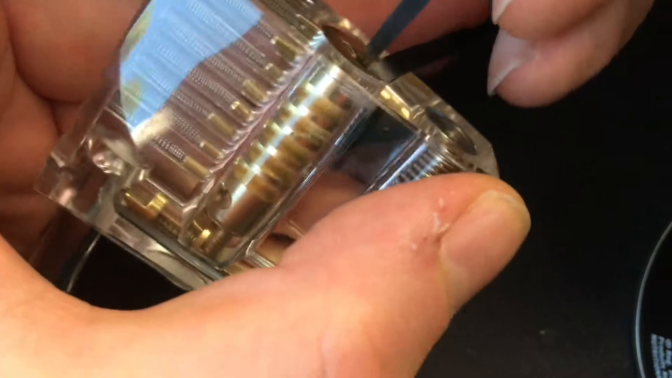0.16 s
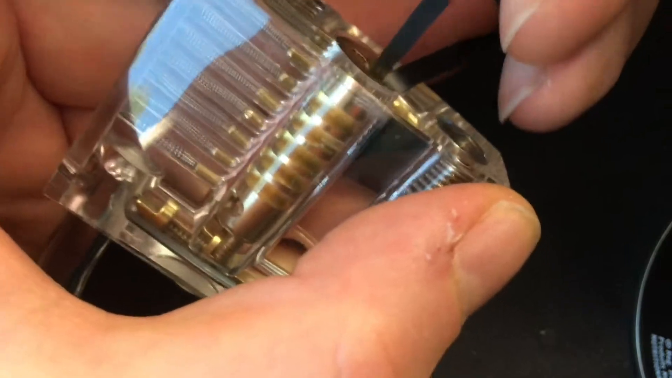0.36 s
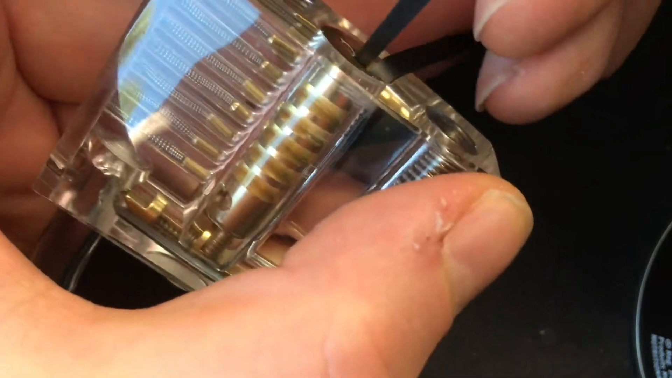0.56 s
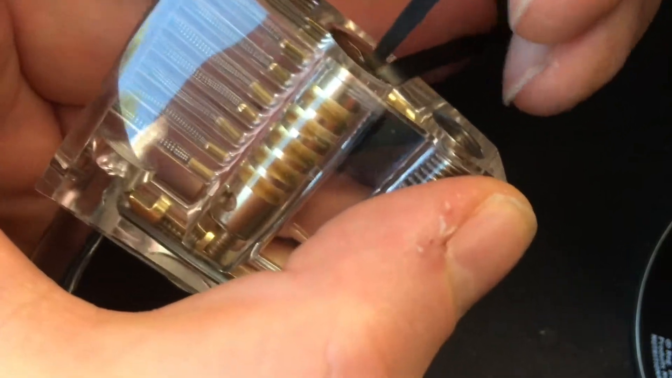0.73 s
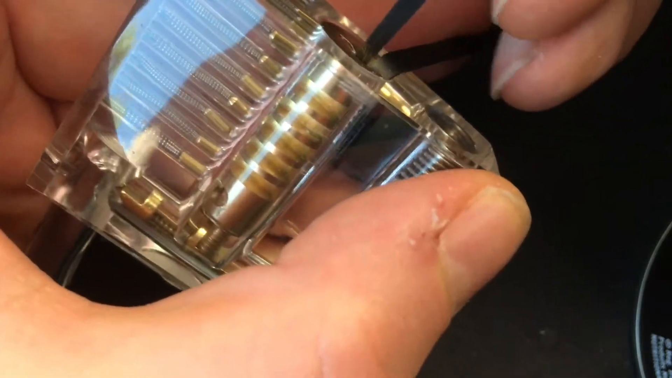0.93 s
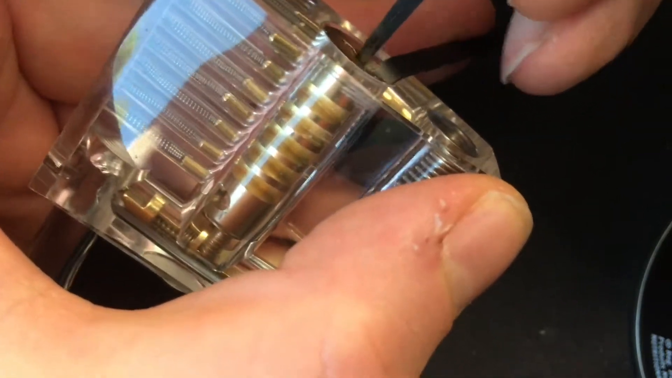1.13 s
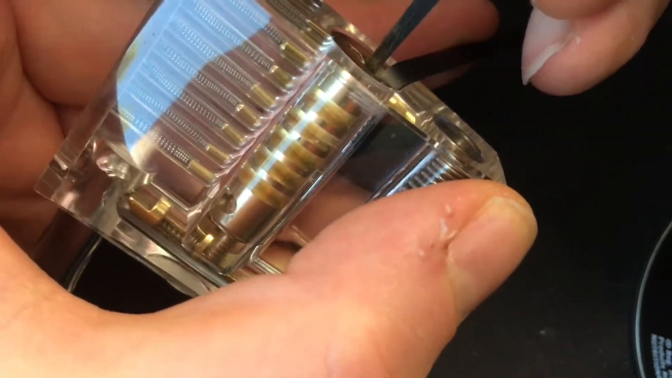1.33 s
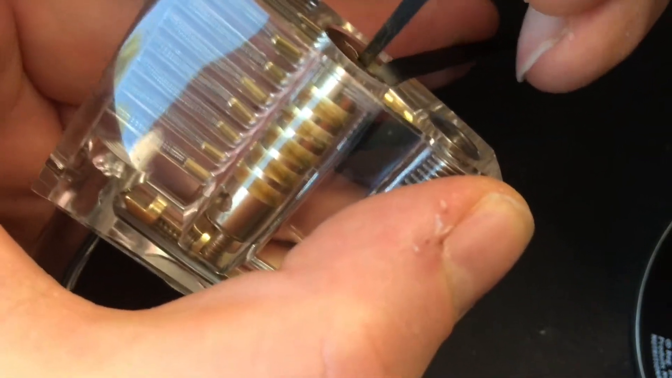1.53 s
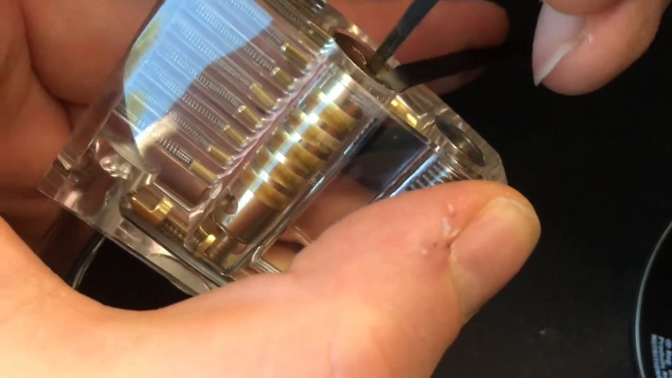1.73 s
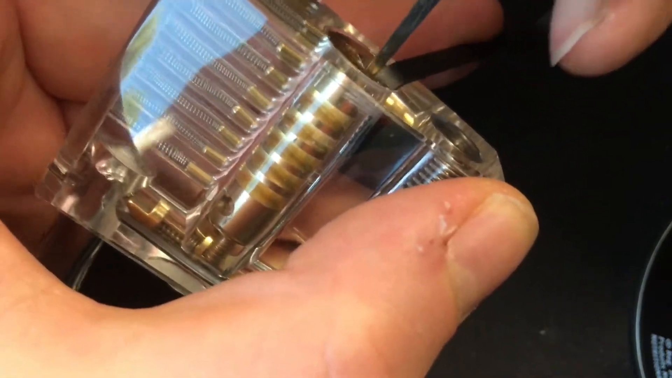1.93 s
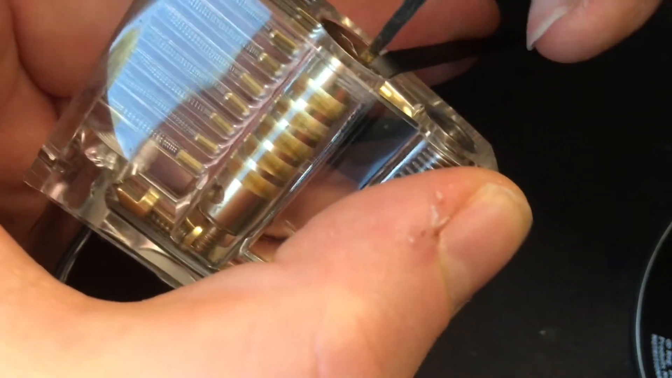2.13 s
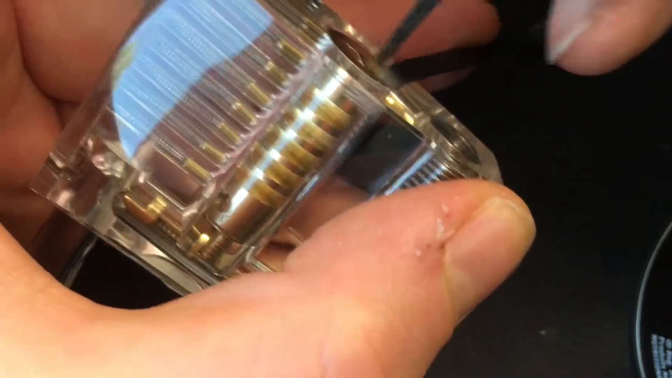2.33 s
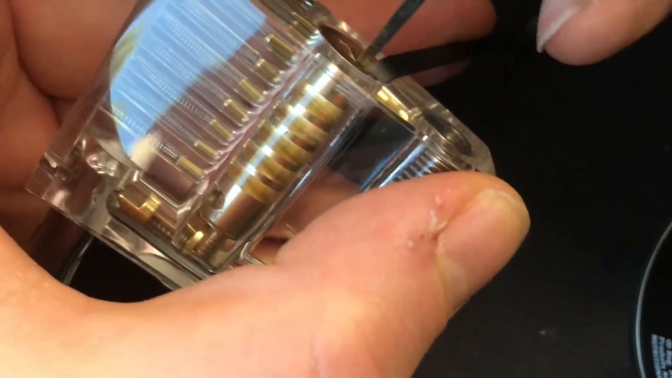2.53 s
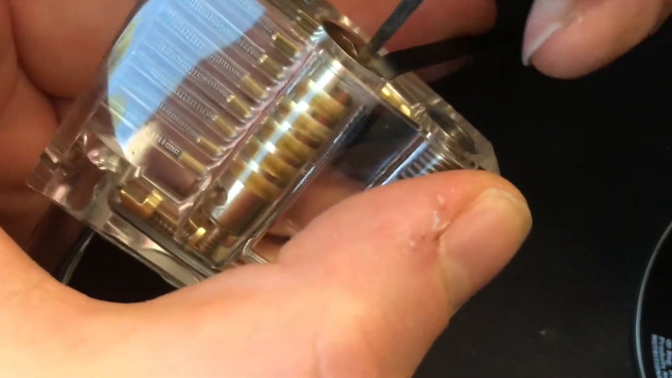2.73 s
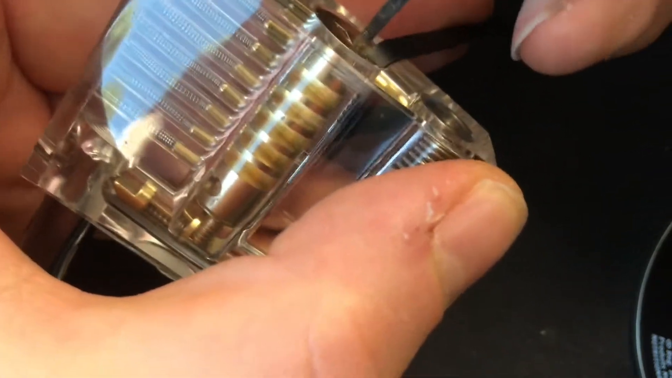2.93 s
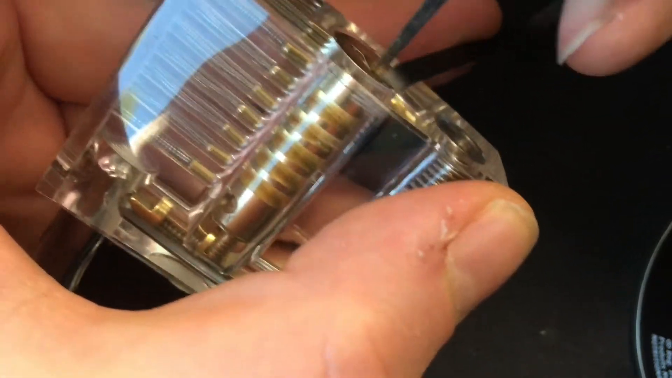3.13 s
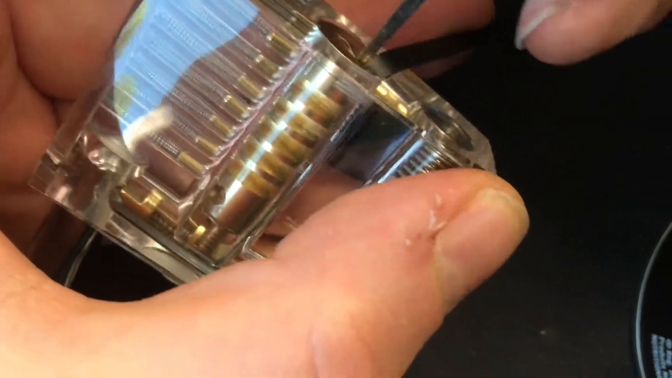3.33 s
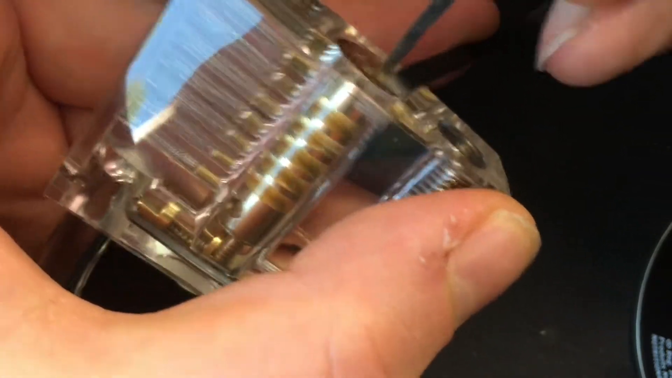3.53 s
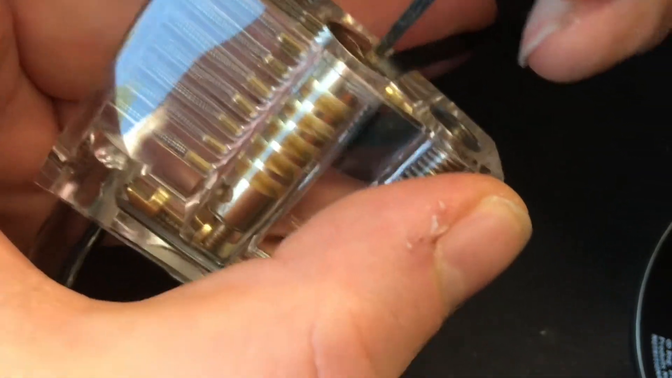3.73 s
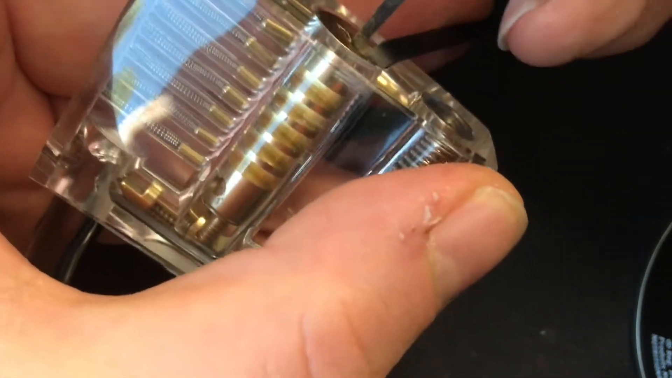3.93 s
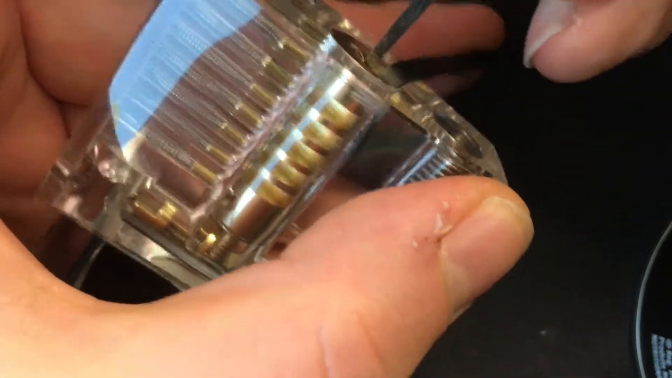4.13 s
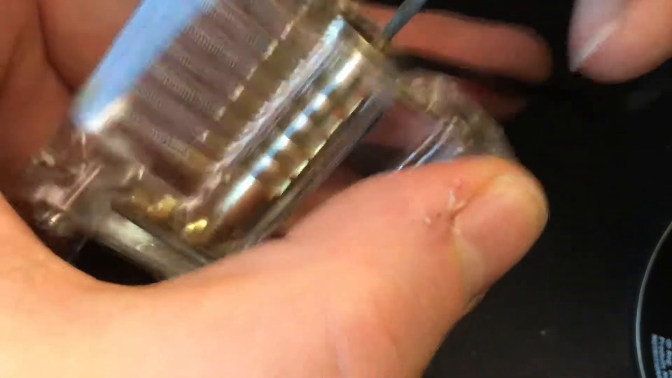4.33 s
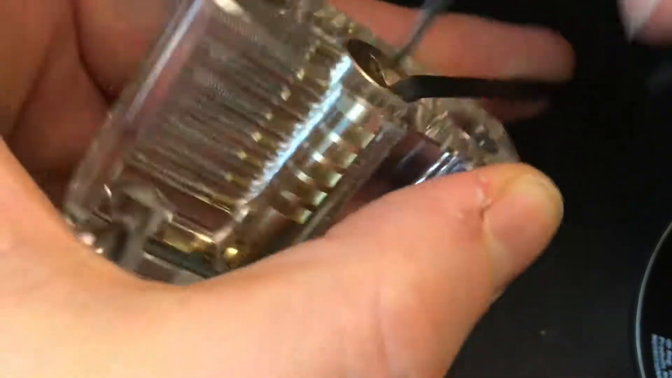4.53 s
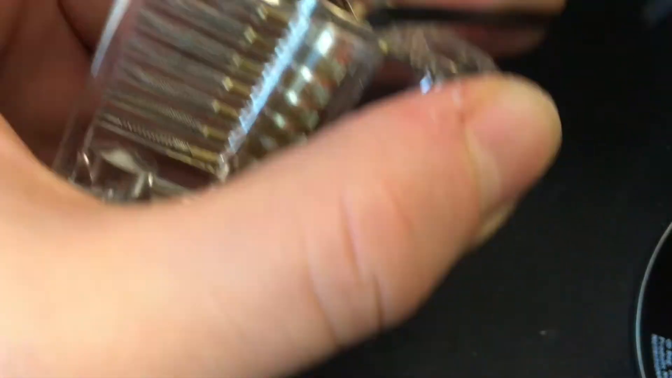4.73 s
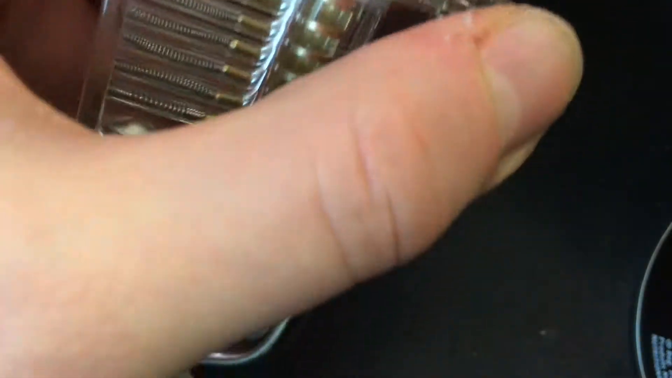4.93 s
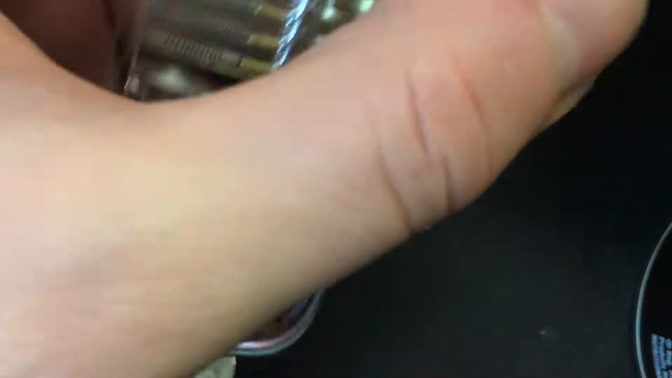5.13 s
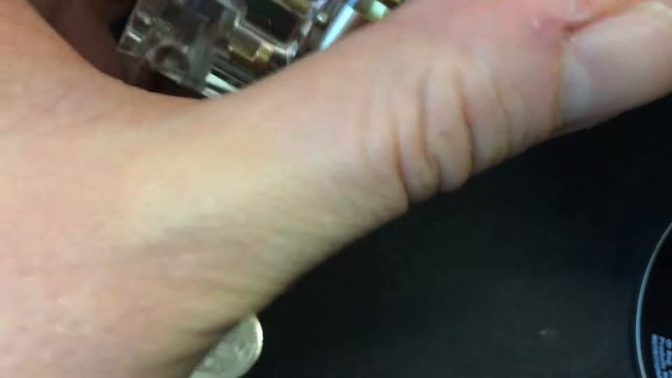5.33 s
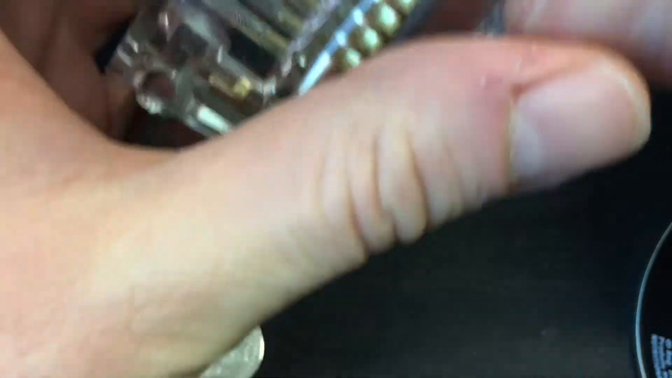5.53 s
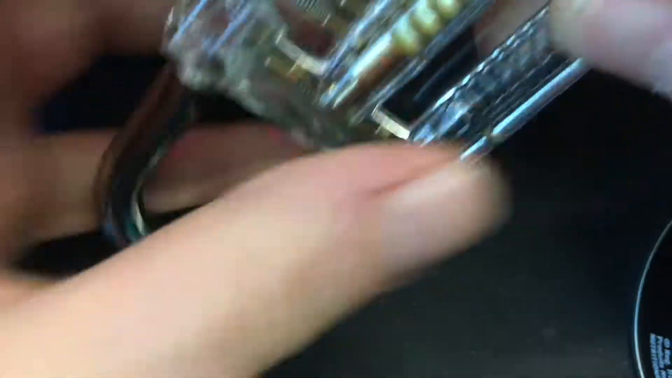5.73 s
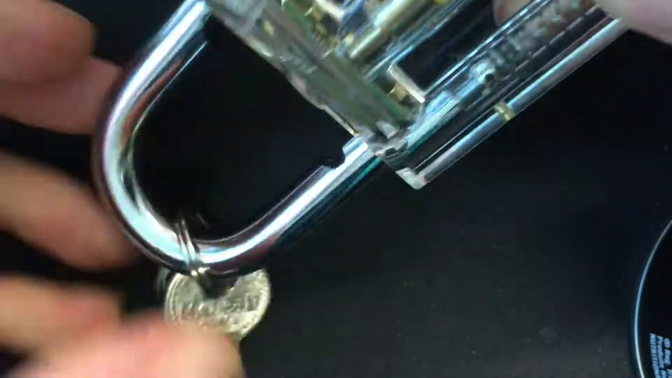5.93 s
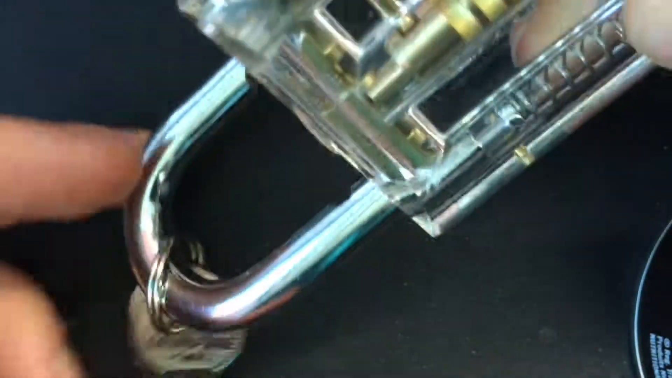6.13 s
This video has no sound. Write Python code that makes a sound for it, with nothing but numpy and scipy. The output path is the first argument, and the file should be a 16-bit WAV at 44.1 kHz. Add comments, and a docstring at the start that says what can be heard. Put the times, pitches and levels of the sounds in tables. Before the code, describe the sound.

Sparse, dry metallic ticks of lock picking, a sudden sharp clack as the shackle springs open, then bright keys jingling, half muffled by the hand.

```python
"""A low room hum and rumble (shaped noise), with a faint grainy hiss that swells and sinks, lie under a
padlock being picked. The pick clicks brass pins (short noisy contacts that ring the plug) and scrapes them
(clumps of tiny grains). Then the shackle of the clear plastic padlock springs open, knocking its case and
jolting the hand (thuds). Keys on the shackle jingle (bright clashes and dying tones), slide and jostle,
muffled now more, now less, as the hand turns the lock. A small room adds a faint echo to lock and keys."""
import sys
import numpy as np
from scipy import signal
from scipy.io import wavfile

SR = 44100
rng = np.random.default_rng(int(sys.argv[2]) if len(sys.argv) > 2 else 0)


def store_pcm(level_fs):
    """Save levels as 16-bit WAV."""
    pcm = np.round(np.clip(level_fs, -1, 1) * 32767).astype(np.int16)
    wavfile.write(sys.argv[1], SR, np.atleast_2d(pcm).T)


N = 272097  # length of the scene in samples
T = np.arange(SR // 2) / SR  # the half second of time that each short sound may fill


def gain_of(db):
    """Turns decibels into an amplitude factor."""
    return 10 ** (np.asarray(db) / 20)


def evened(x):
    """Scales a sound so that its average strength (rms) is 1."""
    return x / np.sqrt(np.mean(x ** 2) + 1e-20)


def unit(x):
    """Scales a sound so that its total energy is 1."""
    return x / np.linalg.norm(x)


def read(points, hz):
    """Reads a curve over frequency, spacing pitches evenly as the ear does."""
    f, value = np.transpose(points)
    return np.interp(np.log(hz + 1), np.log(f + 1), value)


def follow(points, s):
    """Reads a curve over time at the times s."""
    return np.interp(s, *np.transpose(points))


def add(mix, s, sound):
    """Mixes a sound in, starting at time s."""
    part = mix[max(round(s * SR), 0):][:len(sound)]
    part += sound[:len(part)]


def colour(x, points, size=8192):
    """Filters a sound to the given (Hz, dB) shape, with no response ahead of the sound."""
    hz = abs(np.fft.fftfreq(size, 1 / SR))
    log_gain = np.log(gain_of(read(points, hz)))
    # the phase that goes with this shape when the energy comes as early as possible
    spectrum = np.exp(np.conj(signal.hilbert(log_gain)))
    taps = np.fft.ifft(spectrum).real[:size // 2]
    return signal.fftconvolve(x, taps)[:len(x)]


def flutter(n, per_s):
    """A random wobble of rms 1 that changes about per_s times a second."""
    steps = np.arange(n) * per_s / SR
    return np.interp(steps, np.arange(n), rng.standard_normal(n)) * np.sqrt(3 / 2)


def ring(modes, vary_db, stretch=1, detune=0):
    """Adds up dying tones; each blow lands elsewhere and weights them anew."""
    out = np.zeros(len(T))
    for hz, db, t60 in modes:
        mode = np.cos(2 * np.pi * hz * (1 + detune * rng.standard_normal()) * T)
        mode *= gain_of(-60 * T / (t60 * stretch))
        out += gain_of(db + vary_db * rng.standard_normal()) * unit(mode)
    return out


def chatter(decay, snap):
    """One sharp contact within a dying spray of tiny ones."""
    fade = np.exp(-T / max(decay, 1e-4)) * np.minimum(T / 0.00036, 1)
    spray = unit(rng.standard_normal(len(T)) * fade)
    spray[round(.0002 * SR)] += snap
    return unit(spray)


def settling(at_0_db, db):
    """Chatter time of a contact: firmer ones settle sooner, halving with every 27 dB."""
    return at_0_db * 2 ** (-db / 27)


def strike(modes, decay, snap, ring_db):
    """A contact heard directly and through the tones that it sets ringing."""
    contact = chatter(decay, snap)
    body = signal.fftconvolve(contact, unit(ring(modes, vary_db=0.5, detune=0.008)))[:len(T)]
    return unit(contact + gain_of(ring_db) * body)


def slips(length, per_s, clump_db):
    """Stick and slip: a swell of tiny grains that come in clumps."""
    n = int(length * SR)
    size = rng.standard_normal(n) * gain_of(clump_db * np.minimum(flutter(n, per_s=274.5), 2))
    grains = (rng.random(n) < per_s / SR) * size
    return evened(grains) * signal.windows.tukey(n, .6)


# Tone of the room hum. Each row: frequency in Hz, relative strength in dB.
HUM_COLOUR = [(20, -22.5), (48, -16.5), (110, -10), (160, -6.5), (205, -6), (245, -11.5), (290, -10.5),
              (500, -24), (740, -25.5), (1030, -34), (1550, -30.5), (3400, -41), (5200, -52.5),
              (16000, -68)]


def hum():
    """Steady, broad low hum of the room, made of shaped noise."""
    return gain_of(-45.5) * evened(colour(rng.standard_normal(N), HUM_COLOUR))


# Slow rise and fall of the rumble. Each row: time in seconds, level in dB.
RUMBLE_LEVEL = [(0.0, -47.5), (0.27, -49), (0.31, -40), (0.43, -54), (1.17, -42.5), (2.22, -50.5),
                (2.37, -38), (2.8, -47.5), (3.13, -41), (3.2, -54), (3.38, -40.5), (4.19, -51.5),
                (4.45, -44), (4.48, -58.5), (4.55, -44), (4.66, -60), (4.83, -44.5), (5.65, -49),
                (5.84, -41.5), (6.12, -55), (6.17, -35)]
# Tone of the rumble. Each row: frequency in Hz, relative strength in dB.
RUMBLE_TONE = [(20, -30), (40, -7), (60, -1), (110, -4), (170, -9), (400, -40), (1000, -75)]


def rumble():
    """Unsteady low noise that swells and sinks beneath the hum."""
    swells = gain_of(1.84 * flutter(N, per_s=14))
    noise = evened(colour(rng.standard_normal(N), RUMBLE_TONE) * swells)
    return noise * gain_of(follow(RUMBLE_LEVEL, np.arange(N) / SR))


# Swells of the hiss. Each row: start in seconds, length in seconds, level in dB before the fades.
HISS_SWELLS = [(-.1, 0.89, -63), (2.43, 0.47, -67), (4.024, 0.77, -62), (4.814, 0.6, -58.5),
               (5.78, 0.12, -53), (5.96, .3, -60)]
# Tone of the hiss. Each row: frequency in Hz, relative strength in dB.
HISS_COLOUR = [(300, -16), (1000, 8), (3500, 1), (6500, 0), (10000, -2), (16000, -7)]
SWELL_FADE_S, RESTING_DB = 0.19, -75.5  # how gently a swell starts and stops; the hiss between swells


def hiss():
    """Faint grainy hiss that swells and sinks: noise of uneven grain size."""
    t = np.arange(N) / SR
    level = gain_of(RESTING_DB) * np.ones(N)
    for s, length, db in HISS_SWELLS:
        inside = np.minimum(t - s, s + length - t)  # seconds to the nearer end of the swell
        level = np.hypot(level, gain_of(db) * np.clip(.5 + inside / SWELL_FADE_S, 0, 1))
    grains = rng.standard_normal(N) * gain_of(2 * np.minimum(rng.exponential(1, N), 5))
    wobble = gain_of(1.84 * flutter(N, per_s=57))
    return evened(colour(grains * wobble, HISS_COLOUR)) * level


# Pins snapping under the pick. Each row: start in seconds, level in dB before colouring,
# body (lower tone) setting in dB, edge (treble) setting in dB, both relative to the level.
PIN_CLICKS = [(0.0477, -3.5, 4, -8.5), (0.3283, 0.5, -7.5, -10), (0.36, -3, -1.5, -12),
              (0.4934, -10.5, -5, -14.5), (0.51, -14.5, 8.5, -11), (0.675, -4.5, -5, -8.5),
              (0.755, -17, 1, -2.5), (1.0502, -12, -9, -11), (1.0564, -9, -9, -3.5),
              (1.092, -15.5, -5, -3.5), (1.1726, -13, -2, -14), (1.178, -2.5, -6.5, -2),
              (1.392, 2.5, -15.5, -17.5), (1.488, -16, -11, -17.5), (1.506, -17.5, -7, -18),
              (1.663, -20, -19, -13), (1.8662, -19.5, -22, -10), (1.8892, -17.5, -18, -6),
              (1.985, -20, 6.5, -23), (2.322, -30, 2, -12), (2.4085, -22, -9, -8),
              (2.653, -13.5, -3.5, -15), (2.7098, -15, 2, -21), (3.1153, -15, -18, -9.5),
              (3.1576, -8, -21, -9.5), (3.2078, -21.5, -18, -9), (3.7155, -13.5, -6, -5.5),
              (3.9287, 8, -2.5, -14), (3.9307, 4, -10, 2), (4.1732, -11.5, 1, -18), (4.2656, -16, -9, -3),
              (4.322, -17.5, -15, -19)]
# What the pins and plug ring with.
# Each row: frequency in Hz, relative strength in dB, time in seconds to die by 60 dB.
PLUG_MODES = [(1600, -9, .008), (3700, -7, .012), (4100, -5, .025), (4400, -2, .025), (5800, -8, .01),
              (6350, -8, .01), (8600, -9, .006), (12350, -4, .008), (13600, -10, .006), (15500, -7, .005)]
PIN_CHATTER_S = 0.0023  # fading time of the chatter after a click of 0 dB


def pins():
    """Small brass pins click into place, chattering briefly and ringing the plug."""
    out = np.zeros(N)
    for s, db, body_db, edge_db in PIN_CLICKS:
        shape = [(300, -28.5), (750, body_db - 11.0), (1200, body_db), (1900, body_db - 1),
                 (2900, -6.5), (4200, -1), (6200, edge_db / 2 - .5), (7600, edge_db / 2 - 2),
                 (10300, edge_db + 0.5), (12300, edge_db + 1.5), (16000, edge_db + 0.5)]
        # dull, heavy contacts ring the plug; bright snaps stay dry
        ring_db = -12 - .5 * edge_db
        click = strike(PLUG_MODES, settling(PIN_CHATTER_S, db), snap=0.26, ring_db=ring_db)
        add(out, s, gain_of(db) * colour(click, shape))
    return out


# How long the room's echo lasts. Each row: frequency in Hz, time in seconds to die by 60 dB.
ECHO_T60 = [(200, 0.24), (1500, 0.36), (5000, 0.32), (16000, 0.12)]


def room(x):
    """A small room's faint tail: noise whose highest treble dies first."""
    hz, t, z = signal.stft(rng.standard_normal(len(T)), SR, nperseg=256)
    fading = z * gain_of(-60 * t / read(ECHO_T60, hz)[:, None])
    tail = signal.istft(fading, SR, nperseg=256)[1][:len(T)]
    return signal.fftconvolve(x, unit(tail * np.minimum(T / 0.0086, 1)))[:N]


# The pick dragged along the pins.
# Each row: start in seconds, length in seconds, level in dB before ringing and colouring.
PICK_SCRAPES = [(0.332, 0.05, -44.5), (0.446, 0.046, -61.5), (0.682, 0.027, -53), (0.79, 0.043, -61),
                (1.022, 0.072, -58.5), (1.349, 0.073, -56), (1.866, 0.082, -52), (2.386, 0.11, -59.5),
                (2.636, 0.094, -57), (3.108, 0.093, -57.5), (3.642, 0.039, -51)]


def scrapes():
    """The pick sticks and slips along the pins and rings the plug."""
    out = np.zeros(N)
    for s, length, db in PICK_SCRAPES:
        add(out, s, gain_of(db) * slips(length, per_s=1900, clump_db=3.0))
    out += gain_of(-10) * signal.fftconvolve(out, unit(ring(PLUG_MODES, vary_db=1.5)))[:N]
    return colour(out, [(400, -23), (1400, 4), (2800, 2.5), (4200, 7.0), (6300, 1.5),
                        (7500, -3.5), (16000, -6.5)])


# Bolt and shackle knocking in the case. Each row: start in seconds, level in dB before colouring,
# body (lower tone) setting in dB, edge (treble) setting in dB, both relative to the level.
CASE_KNOCKS = [(4.377, 0, -6, -34), (4.382, -6, -5, -33.5), (4.401, 14, -9, -14.5), (4.4045, 15, -17, -19),
               (4.4154, 22.5, -8.5, -21), (4.4184, 3, 7, -2.5), (4.4325, 1.5, -3, -4.5),
               (4.4862, -0.5, -10, -1.5), (4.533, -2, 4, 5), (4.546, 4, -12, 4), (4.5514, -1, 2, -2),
               (4.562, 3.5, 4, -10), (4.5999, -9, 8.5, 6), (4.6342, -10.5, 0, -22.5),
               (4.9317, -11, -13, -21), (5.0397, -10.5, -8, -11.5), (5.0614, -2.5, -4.5, -32.5),
               (5.1045, -12, -8, -36), (5.3028, -38, 23.5, -5.5), (5.5364, -26.5, 9, -1),
               (6.024, -25, 13, -13)]
# What the case and shackle ring with.
# Each row: frequency in Hz, relative strength in dB, time in seconds to die by 60 dB.
CASE_TONES = [(1080, -4, .035), (1295, -7, .035), (2200, -12, .025), (3750, -9, .012), (4420, 2, .009),
              (4610, -4, .012), (5050, -3, .012), (5870, -7, .012), (7050, -5, .018)]
KNOCK_CHATTER_S = 0.0032  # fading time of the chatter after a knock of 0 dB


def knocks():
    """The bolt lets go, the shackle springs out and rattles against its stop."""
    out = np.zeros(N)
    for s, db, body_db, edge_db in CASE_KNOCKS:
        shape = [(100, body_db - 16), (780, body_db - 8.5), (1050, body_db - 0.5),
                 (2400, body_db - 2.5), (3300, -3), (4600, -6.5), (6800, edge_db / 2),
                 (8000, edge_db / 2 - 3.5), (12000, edge_db + 1.0), (16000, edge_db)]
        knock = strike(CASE_TONES, settling(KNOCK_CHATTER_S, db), snap=.5, ring_db=-4)
        add(out, s, gain_of(db) * colour(knock, shape))
    return out


# Keys striking each other. Each row: start in seconds, clash level in dB before colouring,
# ring level in dB, and which key is hit hardest.
KEY_TOUCHES = [(4.407, 2, -23.5, "high"), (4.4189, 5, -28, "high"), (4.4864, -1, -23.5, "middle"),
               (4.5457, 3, -35, "low"), (4.5534, -3, -28, "high"), (4.6006, -11, -23, "middle"),
               (4.6584, -15, -51, "middle"), (4.839, -13, -59, "middle"), (4.8614, -6, -38, "middle"),
               (4.8737, -11, -37.5, "low"), (4.92, -24.5, -37.5, "high"), (5.1398, -18, -35.5, "middle"),
               (5.165, -18.5, -48, "high"), (5.3205, -27.5, -44.5, "middle"), (5.384, -36, -49, "middle"),
               (5.494, -30.5, -44, "middle"), (5.5352, -11, -30, "high"), (5.5716, -16, -32.5, "middle"),
               (5.5957, -21, -43, "middle"), (5.68, -34, -53.5, "middle"), (5.767, -20.5, -29, "middle"),
               (5.877, -15, -26.5, "middle"), (5.915, -13, -24, "middle"), (5.9301, -18, -22.5, "middle"),
               (5.9707, -18.5, -32, "middle"), (6.0348, -27.5, -56, "high"), (6.13, -24, -43, "middle")]
# How strongly the keys are muffled, tightening and loosening.
# Each row: time in seconds, grip from 0 (free) to 1 (held).
KEY_GRIP = [(4.56, 0), (4.64, 1), (4.84, 0.18), (5.16, 0.32), (5.53, 0.92), (6.17, 0.56)]
FREE_T60_S, HELD_T60_S = 0.26, 0.034  # basic ring time of keys that hang free, and of keys in the hand
BOUNCE_GAP_S, BOUNCE_DB, BOUNCE_LOSS_DB = 0.013, -15, -7.5  # mean gap, first bounce, change per bounce
BOUNCE_T60_S, BOUNCE_CLASH_DB = 0.023, -7  # a bounce rings briefly and clashes less


def keys():
    """Each touch stops the old ring, starts a new one and rebounds; the grip shortens the ring."""
    out = np.zeros(N)
    next_touch = [row[0] for row in KEY_TOUCHES[1:]] + [N / SR]
    for (s, clash_db, ring_db, struck), stop in zip(KEY_TOUCHES, next_touch):
        grip = np.clip(follow(KEY_GRIP, s), 0, 1)
        t60 = FREE_T60_S * (HELD_T60_S / FREE_T60_S) ** grip
        clash, rings = touch(clash_db, ring_db, struck, grip, t60)
        still_free = np.clip((stop - s - T) / .003 + 1, 0, 1)  # fades once the next touch comes
        add(out, s, clash + rings * still_free)
        clash, rings = touch(clash_db, ring_db, struck, grip, BOUNCE_T60_S)
        rebound = gain_of(BOUNCE_CLASH_DB) * clash + rings
        add(out, s, signal.fftconvolve(rebound, bounces()))
    return out


# The three keys, one table each. Each row: frequency in Hz, relative strength in dB,
# ring time as a factor on that of the touch.
LOW_TONES = [(8400, 0, 1.6), (8502, -9, 1.3)]
MIDDLE_TONES = [(8810, -19, .7), (8984, 0, 1), (9063, -11, .6), (9092, -13, .6), (9540, -11, .5),
                (9653, -13, .5)]
HIGH_TONES = [(10275, 0, 1.1), (10480, -15, .5), (13963, -23, .8)]
SHARE_DB, HIGH_SHARE_DB = -7, -9.5  # ring of keys not hit; the high key then takes up this much less
HELD_LOW_DB = -15.5  # what a full grip takes from the ring of the low key


def touch(clash_db, ring_db, struck, grip, t60):
    """One key hits its neighbours: a bright clash, and all three ring."""
    # the many faint upper tones leave a short shimmer
    clash = chatter(0.0064, snap=0.19) + gain_of(-6.5) * chatter(0.023, snap=0)
    shape = [(300, -18.5), (1000, -7.0), (3600, -6.5), (7700, -9), (9000, 7.5), (11200, -5), (16000, -4)]
    clash = gain_of(clash_db) * colour(clash, shape, size=512)
    rings = np.zeros(len(T))
    for key, modes in (("low", LOW_TONES), ("middle", MIDDLE_TONES), ("high", HIGH_TONES)):
        db = ring_db
        if key != struck:
            db += SHARE_DB + (key == "high") * HIGH_SHARE_DB
        if key == "low":
            db += grip * HELD_LOW_DB
        # the shorter the ring, the further it is pulled off pitch, as by fingers that damp a key
        off_pitch = 0.012 * np.exp(-t60 / 0.045)
        tone = ring(modes, vary_db=4.5, stretch=max(t60, .02), detune=off_pitch)
        # a key buzzes against its neighbours until it swings clear
        buzz = .45 * np.exp(-T / .018) * flutter(len(T), per_s=600)
        start_strength = np.std(tone[:SR // 500])
        rings += gain_of(db) * (1 + buzz) * tone / start_strength
    return clash, rings * np.minimum(T / 0.0015, 1)


def bounces(count=3):
    """A few ever weaker rebounds at uneven gaps."""
    out = np.zeros(len(T))
    gaps = BOUNCE_GAP_S * (.5 + rng.random(count))
    for k, s in enumerate(np.cumsum(gaps)):
        add(out, s, gain_of([BOUNCE_DB + k * BOUNCE_LOSS_DB]))
    return out


# The opened shackle jolting the hand.
# Each row: start in seconds, level in dB, fading time of the chatter in seconds before colouring.
HAND_JOLTS = [(4.417, -11, 0.0083), (4.545, -2, 0.0053), (4.557, -0.5, 0.0037), (4.602, -18, 0.0071)]


def jolts():
    """Dull thuds as the opened shackle jolts the hand: short chatter with little treble."""
    out = np.zeros(N)
    for s, db, decay in HAND_JOLTS:
        thud = colour(chatter(decay, snap=0.25), [(40, -24), (130, 9.0), (370, -8), (520, -0.5),
                                                  (800, -13.5), (2000, -14.5), (8000, -39.0)])
        add(out, s, gain_of(db) * unit(thud))
    return out


# The key ring sliding on the shackle.
# Each row: start in seconds, length in seconds, level in dB before colouring.
RING_SLIDES = [(4.529, 0.11, -43.5), (4.856, 0.044, -47), (4.907, 0.029, -53.5), (5.857, 0.088, -49),
               (5.9, 0.065, -47), (5.953, 0.033, -54.5), (6.115, 0.042, -56)]


def slides():
    """The key ring grates over the steel of the shackle in many tiny slips."""
    out = np.zeros(N)
    for s, length, db in RING_SLIDES:
        add(out, s, gain_of(db) * slips(length, per_s=5000, clump_db=3.5))
    return colour(out, [(300, -9.5), (950, 13.0), (1500, -23.5), (3500, 7.5), (5000, -3.5),
                        (7700, 6.0), (9000, 19), (11000, 11), (16000, 6)])


# Keys nudging each other as the lock turns.
# Each row: start in seconds, length in seconds, level in dB before the nudges set the keys ringing.
KEY_JOSTLES = [(4.61, 0.065, -58), (5.102, 0.39, -65.5), (5.773, 0.27, -54)]
JOSTLES_PER_S, JOSTLE_T60_S = 70, 0.041  # average nudges a second, and the basic ring time of each


def jostles():
    """Many faint, quickly damped touches while the keys shift in the hand."""
    out = np.zeros(N)
    for s, length, db in KEY_JOSTLES:
        nudges = slips(length, per_s=JOSTLES_PER_S, clump_db=4.5)
        middle = ring(MIDDLE_TONES, 3, JOSTLE_T60_S)
        high = ring(HIGH_TONES, 2, JOSTLE_T60_S)
        tone = unit(middle + gain_of(-12) * high)
        add(out, s, gain_of(db) * signal.fftconvolve(nudges, tone))
    return out


def scene():
    """Hum, rumble and hiss, with the lock and keys and their echo."""
    picking = pins() + scrapes()
    opening = knocks() + keys() + jolts() + slides() + jostles()
    echo = room(gain_of(-25.5) * picking + gain_of(-23.0) * opening)
    return (hum() + rumble() + hiss() + picking + opening + echo)[None]


def record(dry):
    """Rounds off the loud peaks, then removes what lies above about 16 kHz."""
    low_pass = signal.firwin(255, 16000, window=("kaiser", 8), fs=SR)
    return signal.oaconvolve(np.tanh(dry), low_pass[None], "same")


dry = scene()
out = record(dry)
store_pcm(out)
```